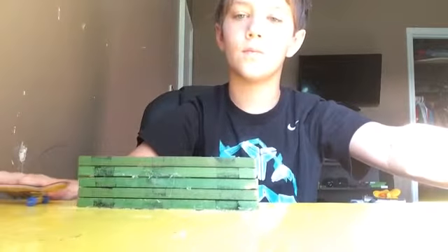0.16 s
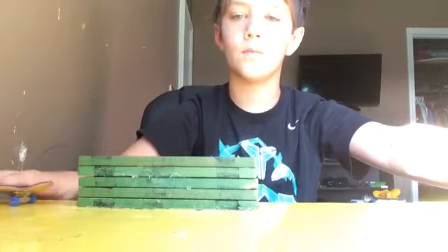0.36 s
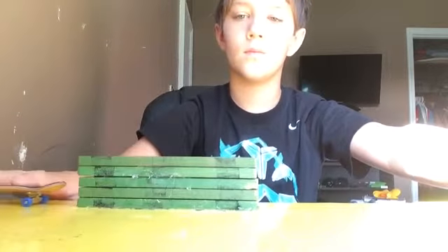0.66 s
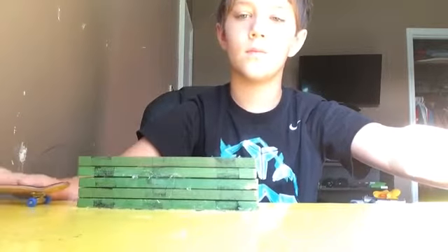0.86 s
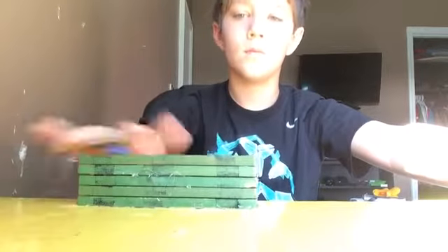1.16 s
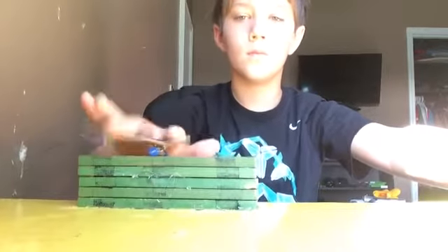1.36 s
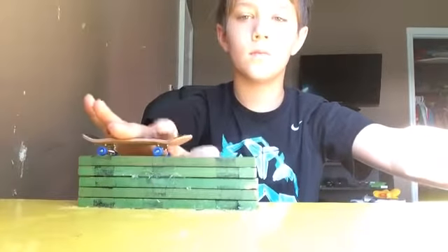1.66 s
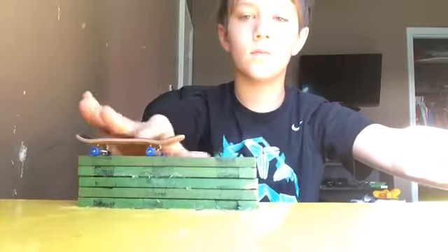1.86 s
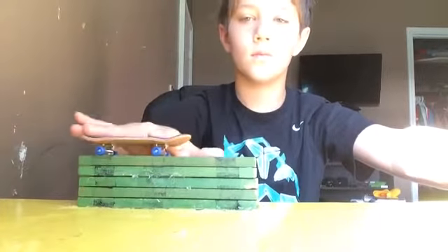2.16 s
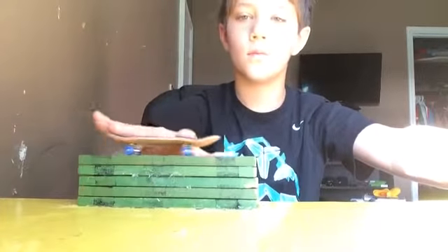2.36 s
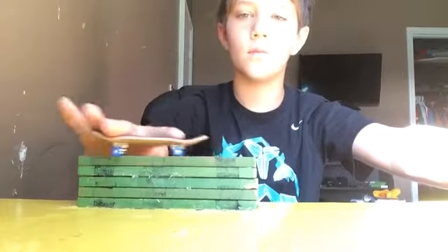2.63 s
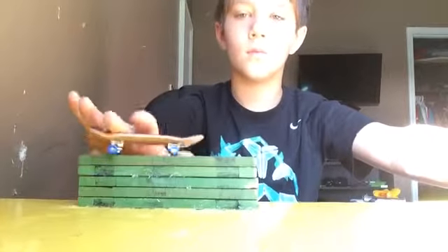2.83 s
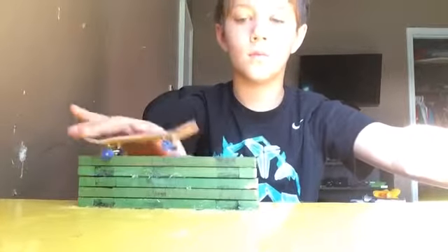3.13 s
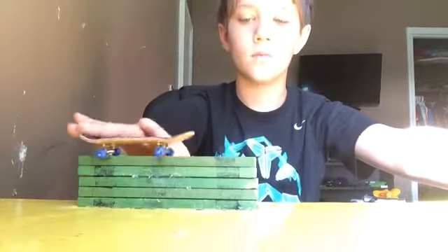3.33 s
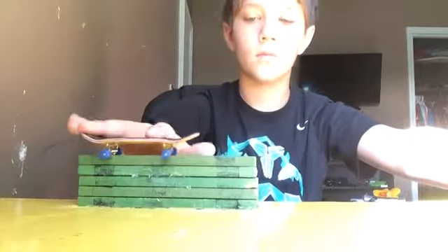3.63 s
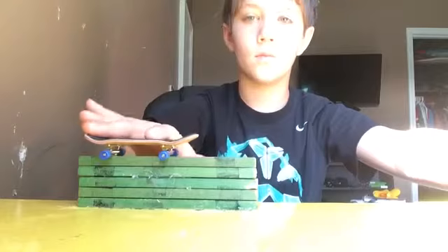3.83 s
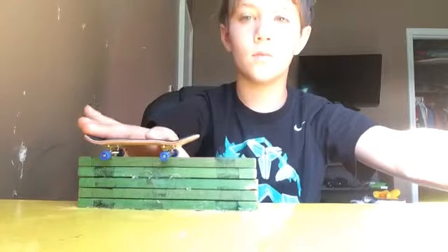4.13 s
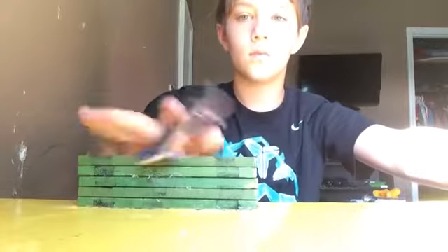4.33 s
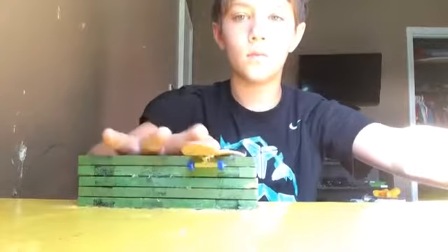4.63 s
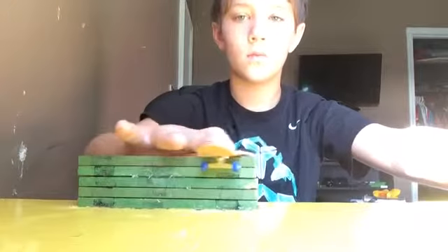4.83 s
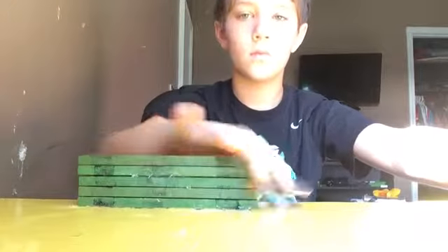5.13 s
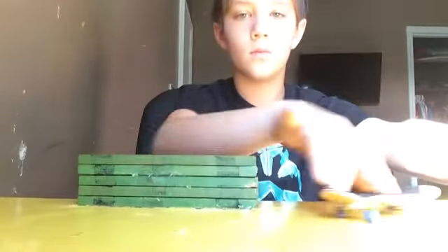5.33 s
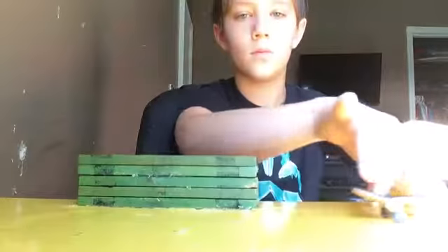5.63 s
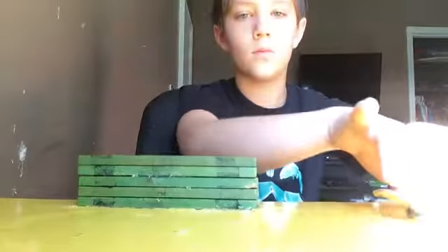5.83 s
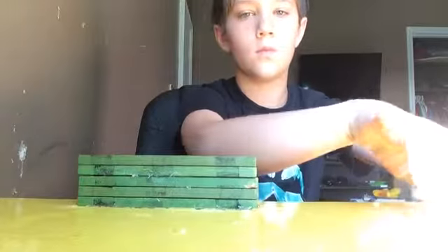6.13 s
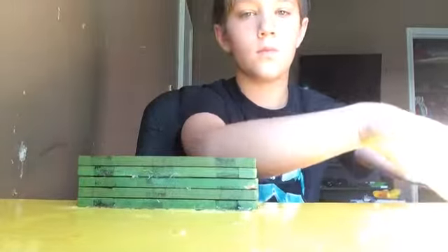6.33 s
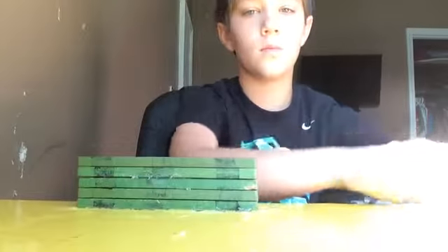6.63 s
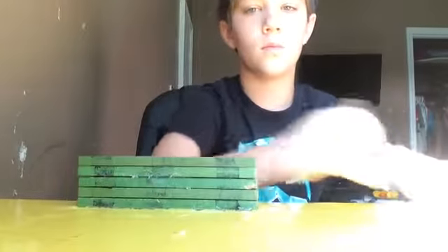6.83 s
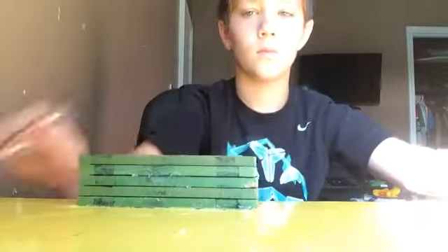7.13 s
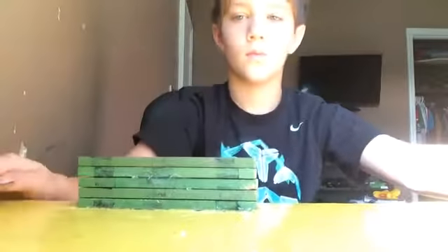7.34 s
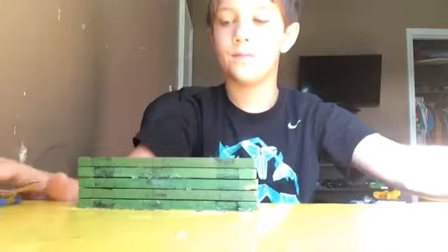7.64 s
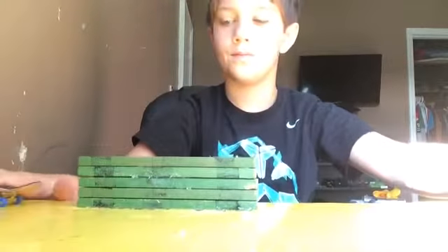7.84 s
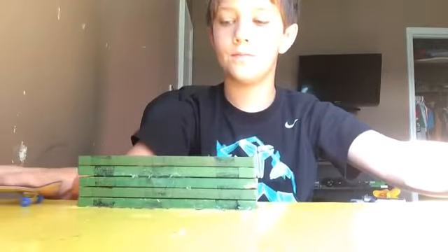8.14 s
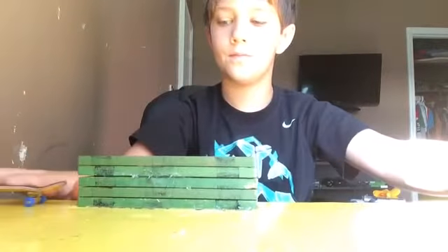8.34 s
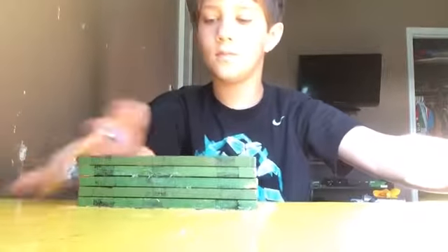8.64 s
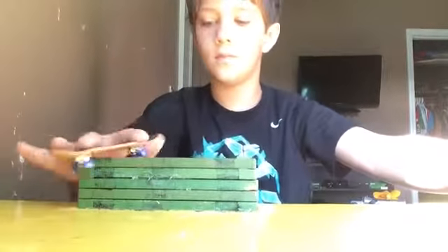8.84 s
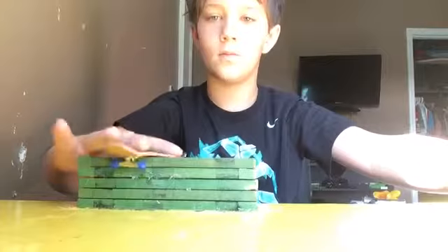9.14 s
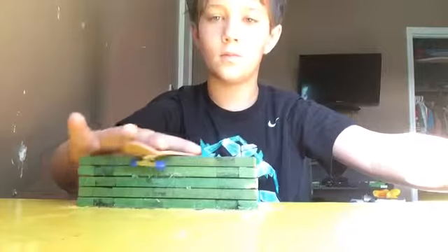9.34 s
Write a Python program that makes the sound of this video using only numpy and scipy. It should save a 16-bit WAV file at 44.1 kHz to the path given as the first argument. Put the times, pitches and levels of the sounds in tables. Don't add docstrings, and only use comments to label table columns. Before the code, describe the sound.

Close sharp clacks and clicks of a tiny fingerboard, with grainy wheel rolling, short scrapes and hollow box knocks in a small room.

```python
import sys
import numpy as np
from scipy import signal
from scipy.fft import rfft, irfft, next_fast_len
from scipy.io import wavfile
from scipy.ndimage import uniform_filter1d, map_coordinates

SR = 44100
rng = np.random.default_rng(int(sys.argv[2]) if len(sys.argv) > 2 else 0)


def generate_wav(signal):
    frames = np.transpose(np.atleast_2d(signal))
    scaled = np.clip(frames, -1, 1) * 32767
    pcm = np.round(scaled).astype(np.int16)
    wavfile.write(sys.argv[1], SR, pcm)


def convert_level_to_amplitude(level_db):
    exponent = np.asarray(level_db, float) / 20
    return 10 ** exponent


N = 418509
LONG = 16384

# f/Hz, width/Hz, level/dB
TABLE_MODES = [(90, 57, -0.5), (161, 66, 5), (256, 43, 4)]
BOX_MODES = [(330, 18, -6.5), (452.2, 29, -1), (554.6, 45, -3), (641, 59, -1), (750, 110, -5),
             (832.4, 59, -0.5), (1000, 34, -9)]
DECK_MODES = [(1170, 82, -7.5), (1460, 120, 0), (1640, 190, -7), (1810, 300, -5), (2180, 55, -4),
              (2450, 110, -4.5), (2695, 200, -11.5), (3200, 240, -8.5)]
AXLE_MODES = [(4700, 1500, -2), (5510, 150, 3), (5940, 1000, -3.5), (7460, 430, 0), (9300, 630, -14),
              (12300, 18000, -9)]


def unit(x):
    return x / np.sqrt(np.mean(x ** 2) + 1e-20)


def peak(spectrum):
    return spectrum / np.abs(irfft(spectrum, LONG)).max()


def along(points, hz):
    f, value = np.transpose(points)
    return np.interp(np.log(hz + 1), np.log(f + 1), value)


def filtered(x, response):
    m = next_fast_len(len(x) + 8192)
    hz = np.fft.rfftfreq(m, 1 / SR)
    smooth = np.interp(hz, hz[::16], response(hz[::16]))
    return irfft(rfft(x, m) * smooth, m)[:len(x)]


def wobble(rate):
    knots = rng.standard_normal(int(N * rate / SR) + 4)
    return map_coordinates(knots, [np.arange(N) * rate / SR])


def body(modes, hz, damping=0.33):
    fc, width, db = np.transpose(modes)[..., None]
    sign = (-1.0) ** np.arange(len(modes))[:, None]
    return np.sum(sign * convert_level_to_amplitude(db) / (1 - 1j * (fc ** 2 - hz ** 2) / (hz * width * damping + 1e-9)), axis=0)


def colour(modes, hz, damping):
    return np.sqrt(sum(np.abs(body([mode], hz, damping=damping)) ** 2 for mode in modes))


def during(s, spans):
    return sum((s > a) & (s < b) for a, b in spans) > 0


def on_box(s):
    # from/s, to/s
    stays = [
        (1.12, 5.085),
        (6.52, 6.7),
        (8.69, 9.5),
    ]
    return during(s, stays)


def on_edge(s):
    # from/s, to/s
    slides = [
        (4.65, 5.16),
        (9.12, 9.5),
    ]
    return during(s, slides)


def air():
    # f/Hz, density/dB per Hz
    tone = [(13, -31.5), (22, -12.5), (129, -4), (196, -6.5), (296, -5), (340, -24), (370, -3), (501, -15),
            (3470, -37.5), (11400, -34.5), (16300, -39.5)]
    hum = unit(filtered(rng.standard_normal(N), lambda hz: convert_level_to_amplitude(along(tone, hz))))
    return convert_level_to_amplitude(-64 + 0.38 * wobble(1.3)) * hum


def echoes(count):
    # f/Hz, t60/s
    decay = [(150, 0.21), (1000, 0.14), (4000, 0.13), (12000, 0.11)]
    hz, t, z = signal.stft(rng.standard_normal((count, LONG // 2)), SR, nperseg=256)
    fading = z * convert_level_to_amplitude(-60 * (t / along(decay, hz)[:, None]) ** 1.25)
    tails = signal.istft(fading, SR, nperseg=256)[1][:, :LONG // 2]
    tails = tails * np.clip(np.arange(LONG // 2) / SR / 0.002, 0, 1) ** 2
    return rfft(tails / np.linalg.norm(tails, axis=1, keepdims=True), LONG)


def diffuse(ring, room, width):
    hz = np.fft.rfftfreq(LONG, 1 / SR)
    blurred = np.sqrt(np.abs(uniform_filter1d(np.abs(ring) ** 2, width)))
    return blurred * room * hz ** 2 / (hz ** 2 + 90 ** 2)


def hits():
    # t/s, peak/dB, box knock/dB, axle click/dB, deck note f/Hz
    clacks = [(2.928, -10, -16.5, -18, 2690), (1.1295, -11, -20.5, -2.5, 2194), (1.1604, -8, -20, 0, 3000),
              (1.1858, -10.5, -17, -8.5, 2165), (1.4189, -10.5, -26, -2.5, 3010),
              (1.6532, -31.5, -3, -4, 2580), (1.917, -20.5, -5, -2.5, 1640), (2.5602, -12.5, -18, -1, 2650),
              (2.6603, -20, -4, -5, 2450), (4.299, -18.5, -10.5, 3, 2666), (4.411, -7.5, -22, -14, 1457),
              (4.438, -10, -46.5, -7.5, 1590), (5.167, -4, -19.5, 1, 1855), (5.1825, -10, -13, -4.5, 3080),
              (5.195, -3, -17.5, -1.5, 2420), (6.456, -22, -25.5, -5.5, 3360),
              (6.5938, -23.5, -15.5, -10, 2380), (7.235, -7.5, -14, 3.5, 2250),
              (7.2418, -6, -26, -2.5, 3270), (7.2768, -7, -18, -4, 1384), (8.6675, -5, -14, -10, 1190),
              (8.7071, -9, -8, -2.5, 1000), (8.8253, -26.5, -10.5, -3.5, 2410), (8.852, -24, -9, -4, 1230)]
    # t/s, peak/dB, box knock/dB, axle click/dB, deck note f/Hz
    slams = [(0.236, -29, -13, -0.5, 1590), (1.0963, -15, -12.5, 8.5, 1460), (2.0603, -32, -3.5, -46, 1550),
             (2.4382, -35, 6, -38, 1340), (3.2172, -39.5, -5, -25, 1660), (4.2626, -34.5, -2.5, -12, 960),
             (4.4318, -14.5, -6, -12, 1600), (4.578, -14.5, 3.5, -8.5, 3130), (4.5865, -17, -15, -15, 1460),
             (4.603, -17, -10, -31, 1170), (5.9687, -40, -13, -7, 1080), (6.0247, -35.5, -29, -33, 1130),
             (6.536, -28.5, -21, -31, 2263), (6.564, -17.5, -29.5, -3, 1800), (6.6054, -21, -27, -2, 1616),
             (6.6294, -19, -2.5, -40, 1460), (6.7706, -16, -7.5, 11.5, 2800), (7.2952, -18.5, -12, 5, 1550),
             (8.6127, -17, -11, 14, 1370), (8.8737, -32, -5, -10, 996), (9.044, -21, -8, -30, 3040),
             (9.0766, -9, -4.5, -8, 1480)]
    # t/s, peak/dB, box knock/dB, deck note f/Hz
    taps = [(0.4491, -40.5, -8.5, 1220), (1.0297, -23.5, -21, 1560), (1.1712, -15, -17, 2250),
            (1.1996, -13.5, -10.5, 1460), (1.2133, -14, -18, 2180), (1.494, -24, -29, 1460),
            (2.7667, -23, -4.5, 2210), (2.382, -33, -15, 2200), (3.455, -45.5, -21, 1490),
            (4.21, -55.5, 7.5, 1207), (8.049, -44, -9, 1403), (8.32, -47.5, -24, 3200),
            (2.9333, -6, -12.5, 1414), (3.1159, -18.5, -14, 1380), (3.249, -17, -11.5, 2540),
            (3.269, -17, -32, 2180), (3.338, -25, -7.5, 2360), (3.5599, -28, -6, 1260),
            (3.7438, -24.5, -13.5, 2140), (3.7832, -23, -13.5, 1640), (3.917, -22.5, -12, 1370),
            (4.3232, -15.5, -10.5, 1460), (4.358, -10.5, -15.5, 1570), (5.291, -27, -25, 1360),
            (8.523, -30, -29, 1360), (8.9307, -23, -10, 1600), (9.058, -11, -19, 1580)]
    # t/s, peak/dB, deck note f/Hz
    ticks = [(0.3302, -41.5, 1387), (1.5066, -30, 1400), (1.5262, -29, 1410), (2.225, -37, 1180),
             (2.2584, -31, 2250), (2.4155, -31, 2180), (2.6192, -28, 2180), (2.9926, -27.5, 2200),
             (3.1675, -31.5, 1560), (3.3896, -30, 2200), (3.6459, -36, 1600), (3.7159, -31, 1640),
             (3.7249, -27.5, 2590), (3.776, -25.5, 1450), (3.8364, -25.5, 1580), (3.8788, -31, 1590),
             (3.8909, -48, 1610), (5.3771, -29.5, 1220), (5.402, -32.5, 1550), (5.5481, -29.5, 1550),
             (5.566, -32.5, 1190), (5.725, -38, 1550), (6.1692, -36, 1100), (7.4845, -37.5, 1160),
             (7.537, -34, 3360), (7.6229, -43, 1493), (7.7667, -40, 3040), (7.786, -37, 1400),
             (8.986, -42, 2060), (9.2271, -30.5, 1640)]
    # t/s, peak/dB, deck note f/Hz
    further_ticks = [(2.293, -42, 2200), (2.317, -39, 2200), (2.3641, -29, 875), (2.399, -36, 1270),
                     (2.554, -25, 2300), (3.69, -38, 1600), (3.7005, -46, 1500), (3.7615, -28, 2080),
                     (3.804, -35.5, 1500), (3.818, -41, 1500), (3.857, -35, 1510), (3.867, -38, 1610),
                     (3.9, -33, 1600), (3.927, -33, 2180), (6.2213, -43, 1400), (6.2557, -33, 2460),
                     (6.3047, -28.5, 1140), (6.067, -45, 1160), (6.4212, -26.5, 1180), (6.6791, -29.5, 1730),
                     (6.7076, -32.5, 2530), (6.7475, -17, 2870), (7.7025, -46, 1330), (7.99, -57, 1440),
                     (8.3543, -44, 1640), (8.3667, -47, 1380), (8.3842, -47, 1500), (8.4126, -43, 1460),
                     (1.1404, -24, 1810), (2.9048, -34, 845), (2.9204, -33, 2000), (3.0908, -41, 2200),
                     (3.099, -42, 1460), (3.1364, -36, 2230), (3.238, -31, 1860), (3.2564, -16.5, 2150),
                     (3.2624, -19.5, 2270), (3.2804, -25, 2080), (4.2923, -16.5, 2180), (5.746, -39.5, 1200),
                     (9.0895, -17.5, 1490), (8.993, -42, 2500)]
    clack_thud_db, slam_thud_db, tap_thud_db, tick_thud_db = -26.5, -11, -30.5, -43.5
    tap_click_db, tick_click_db, further_click_db = -30, -32, -22.5

    def light(events, click_db):
        rows = []
        for s, db, note_hz in events:
            knock_db = -10.5 if on_box(s) else -17
            rows.append((s, db, tick_thud_db, knock_db, click_db, note_hz))
        return rows

    rows = [(s, db, clack_thud_db, *rest) for s, db, *rest in clacks]
    rows += [(s, db, slam_thud_db, *rest) for s, db, *rest in slams]
    rows += [(s, db, tap_thud_db, knock_db, tap_click_db, hz) for s, db, knock_db, hz in taps]
    rows += light(ticks, tick_click_db)
    return np.array(sorted(rows) + light(further_ticks, further_click_db))


def bumps(per_s, spread_db, smooth_db):
    hit = rng.random(N) < per_s / SR
    size = convert_level_to_amplitude(spread_db * np.minimum(rng.exponential(size=N), 3.5)) * rng.standard_normal(N)
    return unit(unit(hit * size) + convert_level_to_amplitude(smooth_db) * rng.standard_normal(N))


def patches(x, patchy_db):
    z = signal.stft(x, nperseg=512)[2]
    field = uniform_filter1d(rng.standard_normal(z.shape), size=7, axis=0)
    field = uniform_filter1d(field, size=12, axis=1)
    field = field - uniform_filter1d(field, size=60, axis=0)
    return signal.istft(z * convert_level_to_amplitude(patchy_db * unit(field)), nperseg=512)[1][:N]


def swells(top_s, rise_s, fall_s, top_db, rest_db):
    t = np.arange(0, N / SR + .002, .002)[:, None]
    away = np.maximum((top_s - t) / rise_s, (t - top_s) / fall_s)
    power = np.sum(convert_level_to_amplitude(top_db - 20 * away) ** 2, axis=1) + convert_level_to_amplitude(rest_db) ** 2
    return np.interp(np.arange(N) / SR, t[:, 0], np.sqrt(power))


def effort():
    # fastest at t/s, rise/s, fall/s, deck level/dB, finger weight/dB
    box_pushes = [(1.211, 0.094, 0.072, -34, 2), (1.46, .17, 0.19, -40, -2),
                  (1.92, 0.22, 0.091, -55.5, 1.5), (2.08, 0.091, 0.058, -58.5, 4),
                  (2.267, 0.07, 0.3, -44, 2), (2.422, 0.097, 0.057, -38.5, 3), (2.58, .045, 0.15, -60, 0),
                  (2.661, 0.092, 0.073, -39.5, 6), (2.79, 0.032, 0.12, -41.5, 4.5),
                  (2.95, 0.17, 0.12, -51.5, 7.5), (3.12, 0.12, 0.13, -46, 0.5),
                  (3.28, 0.035, 0.12, -34.5, 3), (3.58, 0.1, 0.13, -53, 5), (3.75, 0.4, 0.19, -55.5, 3),
                  (3.891, 0.097, 0.082, -38, 0.5), (4.31, 0.074, 0.63, -42, -20.5),
                  (4.46, 0.14, 0.057, -30.5, 0.5), (4.608, 0.053, 0.052, -30, 7.5),
                  (5.1, 0.49, 0.18, -48, 3.5), (8.75, 0.11, 0.054, -33, 5.5), (8.85, 0.18, 0.078, -48, 0),
                  (9.051, 0.028, 0.06, -28, 5), (9.18, 0.042, 0.87, -50.5, -10), (9.49, 0.49, .45, -44, 8)]
    # fastest at t/s, rise/s, fall/s, deck level/dB, finger weight/dB
    free_pushes = [(0.0, .1, 0.15, -51, 0.5), (.26, 0.076, 0.26, -56, -6), (.65, 0.089, 0.11, -58.5, 0.5),
                   (1.1, 0.035, 0.14, -34.5, -11.5), (5.2, 0.055, 0.46, -34, -15.5),
                   (5.36, 0.43, 0.099, -34, -11), (5.57, 0.12, 0.1, -46, -3.5),
                   (5.72, 0.063, 0.059, -46.5, -4), (5.84, 0.063, 0.2, -53.5, 1.5),
                   (6.04, 0.19, 0.075, -51, -1.5), (6.25, 0.08, 0.18, -33, -7.5),
                   (6.42, 0.049, 0.062, -32.5, 0), (6.6, 0.059, 0.13, -28, -3),
                   (6.78, 0.48, 0.082, -41.5, -6), (7.279, 0.043, 0.098, -28.5, -16),
                   (7.51, 0.047, 0.044, -46.5, 4), (7.64, 0.1, 0.13, -47.5, -2.5),
                   (7.78, 0.049, 0.05, -43, -2), (8.08, 0.16, 0.12, -56, 5.5),
                   (8.4, 0.096, 0.068, -50, -0.5), (8.62, 0.052, 0.22, -55, 0)]
    box_rest_db, deck_rest_db, axle_rest_db = -78, -74.5, -86
    buzz_db, buzz_rise_s, buzz_fall_s = -37, .012, .095
    *when, deck_db, weight_db = np.transpose(box_pushes + free_pushes)
    s, db, _, _, click_db, _ = hits().T
    box = swells(*when, deck_db + weight_db, box_rest_db)
    deck = swells(*when, deck_db, deck_rest_db)
    buzz = swells(s + buzz_rise_s, buzz_rise_s, buzz_fall_s, db + click_db + buzz_db, axle_rest_db)
    return np.array([box, deck, np.hypot(convert_level_to_amplitude(-33) * box, buzz)])


def crumbs():
    axle_pings = [(6200, 1500, -1.5), (8500, 2500, -11)]
    snaps = bumps(per_s=450, spread_db=3.5, smooth_db=-20)

    def ping(hz):
        return body(DECK_MODES, hz, damping=1.6) + convert_level_to_amplitude(-19) * body(axle_pings, hz, damping=0.83)

    return unit(filtered(snaps, ping))


def rolling():
    t = np.arange(N) / SR
    boxed, sliding = on_box(t), on_edge(t)
    box_gain, deck_gain, grit_gain = effort()
    wheels = boxed & ~sliding
    waver = unit(convert_level_to_amplitude(2.5 * wobble(40)))
    grainy = bumps(per_s=350, spread_db=2.5, smooth_db=4.0)
    smooth = bumps(per_s=310, spread_db=1.0, smooth_db=7.0)
    force = patches(np.where(wheels, grainy, smooth) * waver, patchy_db=2.4)

    def pressed_deck(hz):
        modes = DECK_MODES + [(4000, 1600, -19.5)]
        return colour(modes, hz, damping=0.97) / np.hypot(1, hz / 2600)

    def loose_deck(hz):
        modes = DECK_MODES + [(1150, 40, 1.2), (4000, 1600, -20)]
        return colour(modes, hz, damping=0.65) / np.hypot(1, hz / 1600)

    hollow = unit(filtered(force, lambda hz: body(BOX_MODES, hz, damping=0.84) + convert_level_to_amplitude(-22.5) * body(TABLE_MODES, hz)))
    solid = unit(filtered(force, lambda hz: colour(BOX_MODES[2:], hz, damping=1.2)))
    pressed = unit(filtered(force, pressed_deck))
    loose = unit(filtered(force, loose_deck))
    rub = force + convert_level_to_amplitude(5.0) * rng.standard_normal(N)
    grit = unit(filtered(rub, lambda hz: colour(AXLE_MODES, hz, damping=0.4)))
    crumb_gain = convert_level_to_amplitude(-9 - 6 * ~boxed) * ~sliding
    deck = np.where(wheels, pressed, loose) + crumb_gain * crumbs()
    slide_gain = convert_level_to_amplitude(9 * sliding)
    return box_gain * np.where(boxed, hollow, solid) + deck_gain * deck + grit_gain * slide_gain * grit


def single_notes(top):
    # t/s, length/s, peak/dB, f/Hz, width/Hz
    sings = [(1.405, .016, -39, 3380, 300), (2.337, .024, -48, 6200, 1200), (2.424, .028, -46, 6000, 1000),
             (2.65, .026, -34, 5800, 900), (4.962, 0.027, -46, 350, 60), (4.97, 0.067, -40, 830, 100),
             (5.017, 0.2, -39, 5400, 300), (5.07, 0.089, -41, 3770, 300), (5.1, 0.049, -35, 2200, 200),
             (5.129, 0.032, -19.5, 574, 120), (5.288, 0.02, -25, 2300, 250), (5.308, 0.03, -32, 1500, 150),
             (5.33, 0.027, -23.5, 1150, 120), (5.4, 0.019, -43, 1510, 150), (5.412, 0.016, -35, 1500, 120),
             (6.662, .07, -34.5, 7660, 600), (6.908, 0.53, -57.5, 4000, 5000),
             (7.138, 0.028, -46.5, 6000, 5020), (7.49, 0.018, -43.5, 760, 200),
             (7.55, 0.028, -46, 3160, 200), (7.562, 0.031, -36.5, 1480, 100),
             (7.608, 0.034, -32, 1410, 150), (7.652, 0.025, -42, 620, 100), (7.718, .024, -45, 1430, 121),
             (7.72, 0.088, -41, 3190, 198), (7.746, 0.019, -37.5, 660, 119), (1.072, .02, -15, 1606, 252),
             (1.096, .025, -26.5, 350, 80), (4.38, 0.032, -23, 2210, 150), (5.109, .054, -19.5, 1404, 150),
             (6.382, 0.024, -31, 1110, 400), (6.29, .06, -32, 2270, 199), (8.583, 0.029, -12.5, 1470, 250),
             (8.627, 0.026, -30, 477, 100), (5.796, 0.069, -59, 1140, 250)]
    # t/s, peak/dB, f/Hz, width/Hz
    thumps = [(1.419, -17.5, 750, 200.6), (1.4935, -28.5, 810, 100), (1.507, -26.5, 826, 100),
              (1.654, -40, 330, 40), (1.918, -28, 335, 24.9), (2.061, -26.5, 804, 200),
              (2.439, -23, 525, 120), (2.381, -27.5, 700, 60), (2.4155, -31, 750, 80),
              (4.438, -11, 840, 90), (2.767, -23, 850, 150), (2.93, -10.5, 800, 120),
              (3.838, -25.5, 725, 121), (4.412, -11.5, 830, 90), (5.168, -21.5, 550, 80.4),
              (5.196, -16.5, 620, 80), (8.612, -23, 494, 100), (8.707, -11, 564, 100), (4.3, -21, 760, 150),
              (4.431, -12, 800, 90), (4.5785, -10.5, 720, 150), (9.078, -9, 553, 100),
              (2.662, -21, 750, 150)]
    out, t = np.zeros(N + LONG), np.arange(LONG // 4) / SR
    rough = bumps(per_s=900, spread_db=3, smooth_db=0)
    for s, length, db, hz, width in sings + [(s, 0, *rest) for s, *rest in thumps]:
        start, u = round(s * SR), np.linspace(0, 1, round(length * SR))
        if len(u):
            force = rough[start:start + len(u)] * np.sin(np.pi * u ** top)
        else:
            force = np.hanning(12)
        note = np.exp(-np.pi * width * t) * np.cos(2 * np.pi * hz * t)
        ring = signal.fftconvolve(force, note)
        out[start:][:len(ring)] += convert_level_to_amplitude(db) * ring / np.abs(ring).max()
    return out[:N]


def voices():
    hz = np.fft.rfftfreq(LONG, 1 / SR)
    parts = []
    for modes, damping in [(DECK_MODES, 1.49), (AXLE_MODES, 3.03), (BOX_MODES, 0.9), (TABLE_MODES, 0.43)]:
        rows = [(-1) ** k * body([mode], hz, damping=damping) for k, mode in enumerate(modes)]
        parts.append(np.array(rows))
    return parts


def struck(force, rows, shift, note_db, crack_db, thud_db, knock_db, click_db, note_hz):
    hz = np.fft.rfftfreq(LONG, 1 / SR)
    places = (0, 26, 9, 16)
    deck, axles, box, table = (convert_level_to_amplitude(shift[at:at + len(part)]) @ part for at, part in zip(places, rows))
    push = force / (1 + 1j * hz / 900)
    deck = deck + convert_level_to_amplitude(note_db) * body([(note_hz, 350, 0)], hz) + convert_level_to_amplitude(-18.5) * body([(3610, 540, 0)], hz)
    deck = deck + convert_level_to_amplitude(crack_db) * body([(1800, 3630, 0)], hz, damping=0.88) ** 2
    ring = peak(force * deck / (1 + 1j * hz / 7200))
    ring = ring + convert_level_to_amplitude(click_db + 4.0) * peak(force * axles)
    return ring + convert_level_to_amplitude(knock_db + 3.0) * peak(push * box) + convert_level_to_amplitude(thud_db - 2.0) * peak(push * table)


def skids(room_db, scatter_db, top):
    # t/s, length/s, peak/dB, grit/dB, deck note f/Hz
    strokes = [(1.074, 0.021, -24, -13, 1720), (1.19, 0.035, -22.5, -4, 2244),
               (1.34, 0.059, -39, -34, 3200), (2.575, 0.065, -26, -27.5, 2320),
               (2.64, 0.0303, -20, -10, 2960), (2.89, 0.038, -37, -20, 2434),
               (3.245, 0.037, -24.5, -33.5, 2380), (4.27, 0.051, -14.5, -19, 2465),
               (4.37, 0.062, -17, -46, 2085), (5.09, .078, -23.5, -15.5, 1380),
               (6.386, 0.048, -21.5, -43, 1040), (6.55, 0.022, -23, -7, 1820),
               (6.7, 0.079, -20.5, -10.5, 2810), (8.574, 0.05, -15, -29, 1555),
               (8.81, 0.037, -35.5, -9, 2500), (9.012, 0.037, -17.5, -41, 1450),
               (7.61, 0.05, -46, -24, 4300), (8.53, 0.0356, -35, -32, 897)]
    out, rooms, parts = np.zeros(N + LONG), echoes(count=5), voices()
    shifts = scatter_db * rng.standard_normal((len(strokes), 32))
    rough = bumps(per_s=1200, spread_db=1.5, smooth_db=3)
    for k, (s, length, db, grit_db, note_hz) in enumerate(strokes):
        start, u = round(s * SR), np.linspace(0, 1, round(length * SR))
        force = rough[start:start + len(u)] * np.sin(np.pi * u ** top)
        knock_db = -7.5 if on_box(s) else -20.5
        ring = struck(rfft(force, LONG), parts, shifts[k], note_db=5.1, crack_db=-30.5, thud_db=-26.5,
                      knock_db=knock_db, click_db=grit_db, note_hz=note_hz)
        wet = 1 + convert_level_to_amplitude(room_db) * rooms[k % len(rooms)]
        out[start:][:LONG] += convert_level_to_amplitude(db) * irfft(ring * wet, LONG)
    return out[:N]


def contacts(room_db, scatter_db, chatter_s, chatter_db, swell_db):
    lead, hollow = 176, 9
    out, t = np.zeros(N + LONG), (np.arange(lead + 300) - lead) / SR
    rooms = echoes(count=9) * np.exp(-2j * np.pi * np.fft.rfftfreq(LONG) * lead)
    rows, parts = hits(), voices()
    shifts = scatter_db * rng.standard_normal((len(rows), 32))
    shifts[:, hollow] = np.where(on_box(rows[:, 0]), 4, -9)
    swell = convert_level_to_amplitude(swell_db) * np.exp(t / 0.0011)
    rattle = convert_level_to_amplitude(chatter_db) * np.exp(-t / chatter_s)
    forces = rng.standard_normal((len(rows), len(t))) * np.where(t < 0, swell, rattle) + (t == 0)
    for k, (s, db, *voice) in enumerate(rows):
        wet = convert_level_to_amplitude(room_db + 0.53 * db)
        ring = struck(rfft(forces[k], LONG), parts, shifts[k], 4.5, -8, *voice)
        answer = diffuse(ring, rooms[k % len(rooms)], width=130)
        out[round(s * SR) - lead:][:LONG] += convert_level_to_amplitude(db + 2.5) * irfft(ring + wet * answer, LONG)
    return out[:N]


def scene():
    blows = contacts(room_db=-4, scatter_db=4.5, chatter_s=0.0025, chatter_db=-18.5, swell_db=-25.5)
    strokes = skids(room_db=-10.0, scatter_db=4, top=1.45)
    return (blows + strokes + rolling() + air() + single_notes(top=1.4))[None]


def band_limit(x):
    return signal.sosfilt(signal.butter(12, 16490, fs=SR, output="sos"), x)


def record(dry):
    # f/Hz, level/dB
    mic = [(20, -9), (60, -1.5), (9000, -0.5), (13000, -5.5), (15200, -6), (15500, -22.5), (16400, -31),
           (16600, -93)]
    held = dry[0] / (1 + np.abs(dry[0] / .8) ** 4) ** (1 / 4)
    soft = filtered(held, lambda hz: convert_level_to_amplitude(along(mic, hz)))[None]
    return band_limit(soft)


dry = scene()
out = record(dry)
generate_wav(out)
```